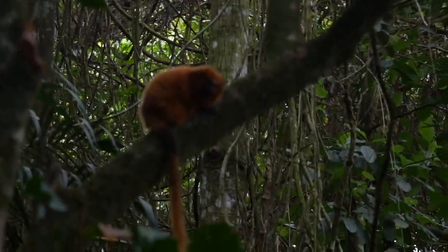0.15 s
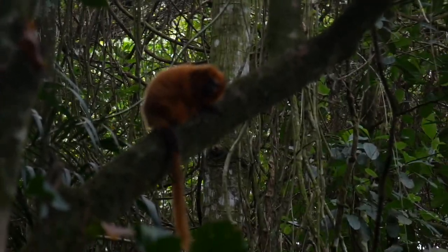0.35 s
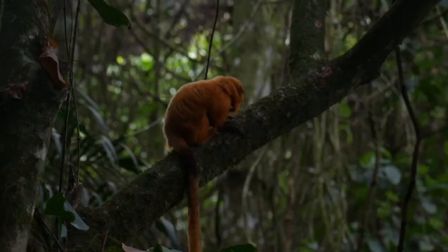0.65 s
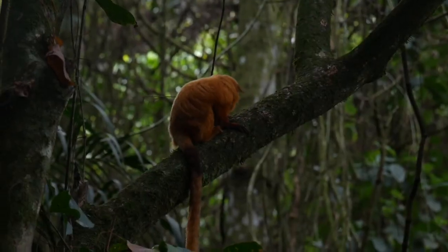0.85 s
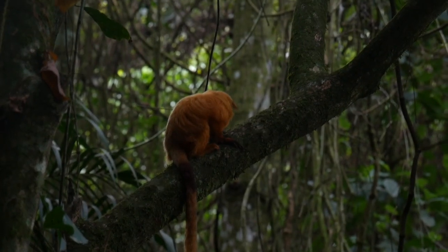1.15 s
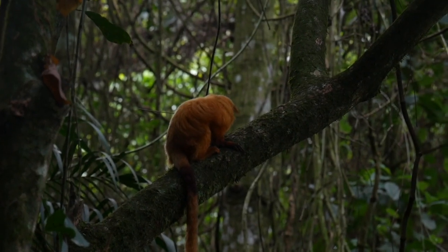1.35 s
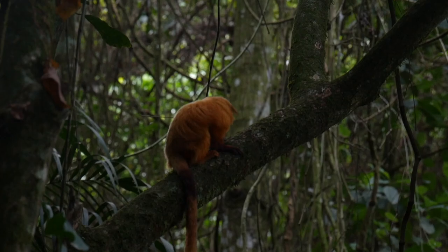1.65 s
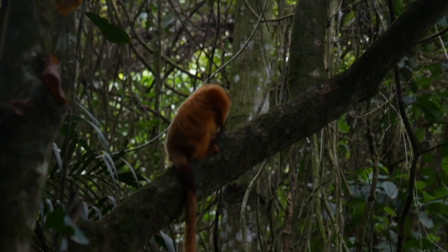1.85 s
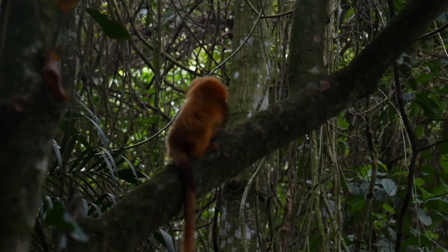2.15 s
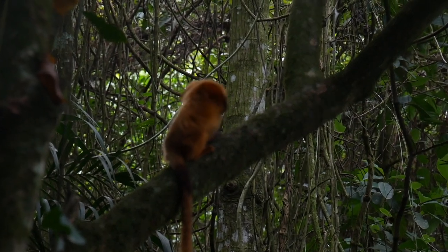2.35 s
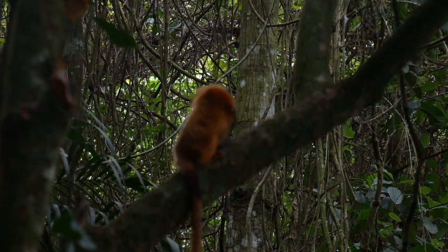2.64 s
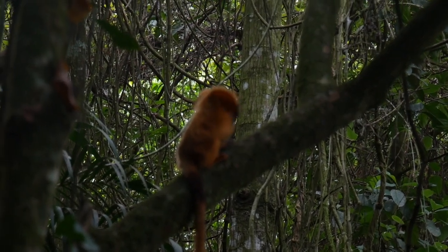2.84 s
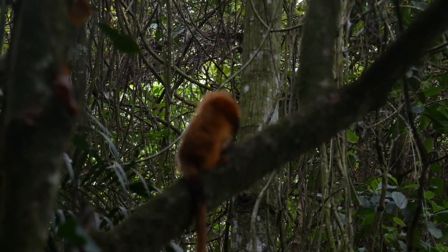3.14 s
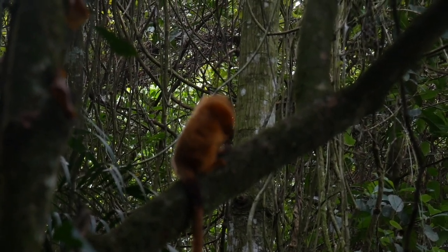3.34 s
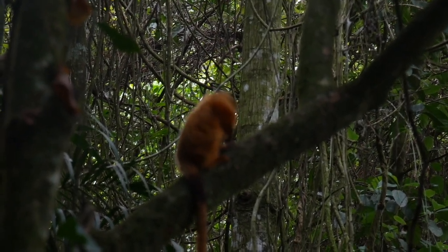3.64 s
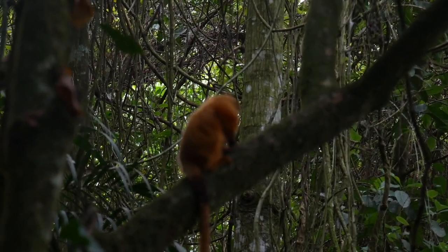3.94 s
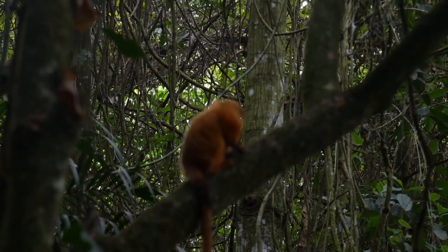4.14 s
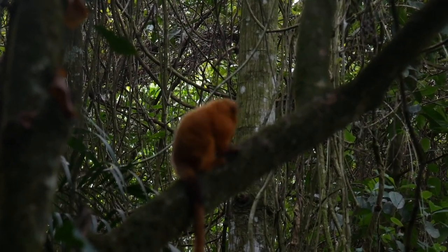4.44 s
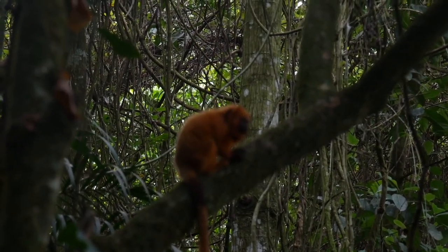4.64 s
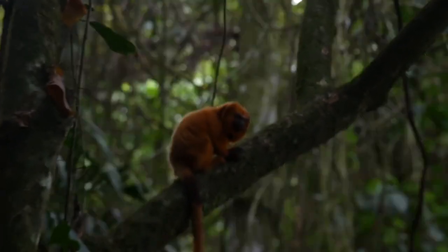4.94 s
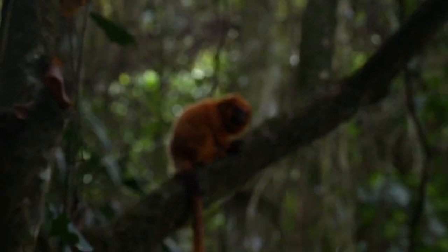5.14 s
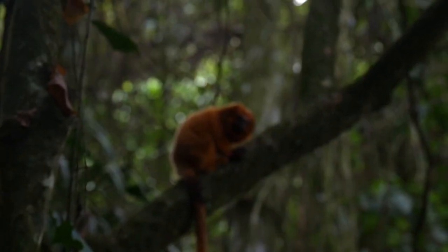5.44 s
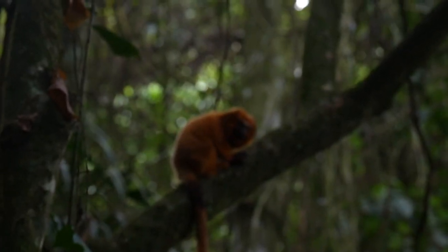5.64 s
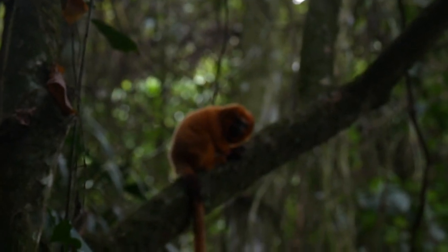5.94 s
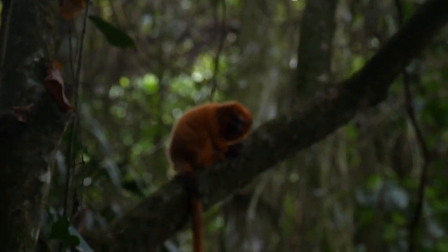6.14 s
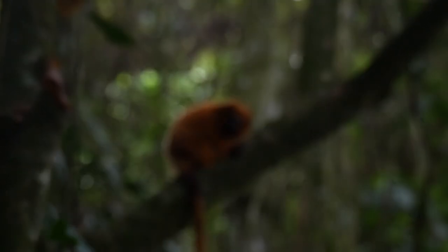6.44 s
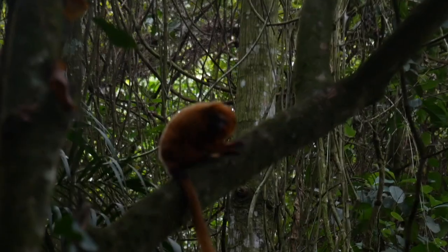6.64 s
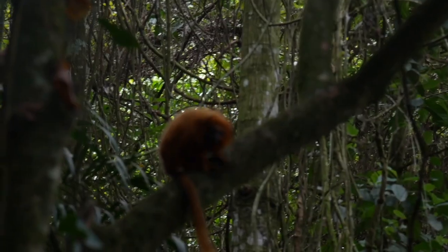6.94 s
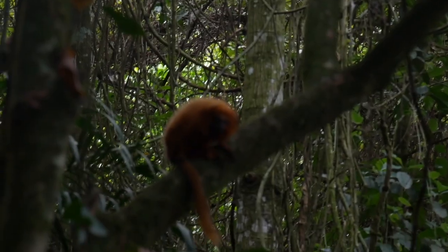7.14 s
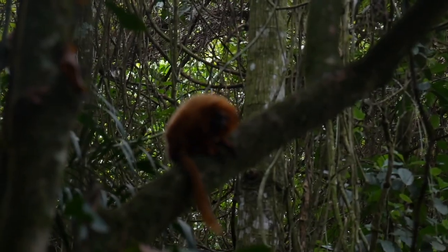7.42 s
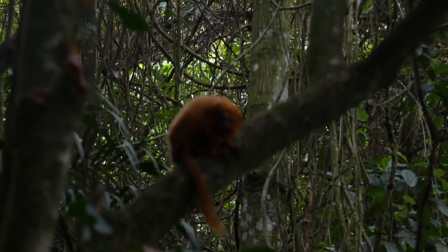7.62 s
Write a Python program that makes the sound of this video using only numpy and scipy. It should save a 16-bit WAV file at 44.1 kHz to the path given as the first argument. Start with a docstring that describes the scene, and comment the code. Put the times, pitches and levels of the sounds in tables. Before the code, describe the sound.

A small monkey opens with a hoarse, high screech lasting until 0.65 seconds, over an even rush of forest foliage, a far wavering hum and one level bird note. A twig snaps sharply close by at 0.1 seconds, another more lightly at 0.5. All sound drops out from 0.65 to 0.95 seconds; the rush returns softer, over a low rumble. From 0.95 to 2.6 seconds the monkey gives four very high, falling whistles, some trilled, each breaking into yips with a short echo. A very faint distant chirp comes near 3.1, then small twig ticks and leaf stirs from 3.5 to 4. Two more whistles with yips follow between 4.2 and 4.9. A twig cracks sharply at 5.1, with lighter ticks and rustles until 6. Two long raspy screeches run from 6.2 to 7.5 seconds, and a short one comes at 7.7.

```python
"""A forest. A tamarin gives long hoarse screeches and high, falling, trilled whistles that break
into yips; the trees echo them. Whistles and yips are gliding tones with an octave, screeches
two bands of fluttering noise. Behind them: a rush of foliage, a far hum, one level bird note and
a faint chirp. Twigs tick close by and leaves stir. All sound drops out from 0.65 to 0.94 s;
the rush returns softer, over a low rumble."""
import sys
import numpy as np
from scipy import signal
from scipy.fft import rfft, irfft, next_fast_len
from scipy.io import wavfile
from scipy.ndimage import map_coordinates

SR = 44100
rng = np.random.default_rng(int(sys.argv[2]) if len(sys.argv) > 2 else 0)


def waveform_to_disk(signal):
    """Save audio, clipped to [-1, 1], as 16-bit WAV at the path in sys.argv[1]."""
    frames = np.transpose(np.atleast_2d(signal))
    scaled = np.clip(frames, -1, 1) * 32767
    samples = np.round(scaled).astype(np.int16)
    wavfile.write(sys.argv[1], SR, samples)


N = 343098
TIME = np.arange(N) / SR
GAP_START_S, GAP_END_S = .648, .939

# voice strength over its range: (pitch [Hz], gain [dB])
VOICE_STRENGTH = [(4000, 0), (5300, -2.5), (6800, 0.5), (8500, -3.5), (12500, -5.5)]


def amp(db):
    """Decibels to gain."""
    return 10 ** (np.asarray(db) / 20)


def unit(x):
    """x at rms 1."""
    return x / np.sqrt(np.mean(x ** 2) + 1e-20)


def along(points, hz):
    """(Hz, value) points read on a log axis."""
    f, v = np.transpose(points)
    return np.interp(np.log(hz + 1), np.log(f + 1), v)


def during(start_s, end_s):
    """Sample times from start to end."""
    return TIME[(TIME >= start_s) & (TIME < end_s)]


def gate(start_s, end_s, ramp_s):
    """Open from start to end, with linear ramps."""
    return np.clip(np.minimum(TIME - start_s, end_s - TIME) / ramp_s + .5, 0, 1)


def arch(t, start_s, length_s):
    """Parabola: 0 mid-sound, -1 at the ends and beyond."""
    return -np.clip(2 * (t - start_s) / length_s - 1, -1, 1) ** 2


def wobble(rate_hz, t=TIME):
    """Smooth random curve, rate_hz knots a second."""
    return map_coordinates(rng.standard_normal(int(N * rate_hz / SR) + 4), [t * rate_hz])


def filtered(x, response):
    """x through a gain given as a function of Hz."""
    m = next_fast_len(N + 8192)
    return irfft(rfft(x, m) * response(np.fft.rfftfreq(m, 1 / SR)), m)[..., :N]


def coloured(x, spectrum):
    """x through a curve of (Hz, dB) points."""
    return filtered(x, lambda hz: amp(along(spectrum, hz)))


def rush(spectrum):
    """Stereo noise at rms 1, nearly mono in the bass, wider in the treble."""
    # left-right likeness: (frequency [Hz], correlation [1])
    likeness = [(60, 0.92), (150, 0.91), (380, 0.75), (950, 0.83), (2380, 0.6), (5980, 0.77), (15000, 0.33)]

    def mid_side_gains(hz):
        angle = np.arccos(np.clip(along(likeness, hz), -1, 1)) / 2
        return amp(along(spectrum, hz)) * [np.cos(angle), np.sin(angle)]

    mid, side = filtered(rng.standard_normal((2, N)), mid_side_gains)
    return unit(np.array([mid + side, mid - side]))


def foliage(early_db=-27.5, late_db=-34.5, drone_hz=56):
    """Even rush of the trees; softer after the gap, over a low rumble and drone."""
    # noise spectra: (frequency [Hz], relative density [dB])
    early_spectrum = [(15, -67), (25, -39.5), (45, -23.5), (85, -19.5), (124, -28.5), (227, -14),
                      (303, -14.5), (343, -4), (381, -11), (510, -12.5), (1100, -10.5), (2190, -30.5),
                      (3600, -41.5), (4680, -62), (7920, -120)]
    late_spectrum = [(70, -43), (120, -16.5), (200, -8), (310, -3), (600, -5), (1000, -4), (1450, -6.5),
                     (2000, -13.5), (2800, -24), (3800, -29), (6000, -42), (10000, -47.5), (14500, -60.5),
                     (15800, -62)]
    rumble_spectrum = [(18, -45), (30, -21.5), (42, -7), (55, 0.5), (75, -4.5), (97, -0.5), (130, -12),
                       (170, -8), (260, -46)]
    # brief dip in the background level just after 2 s: (time [s], gain [dB])
    dip = [(1.0, -1.5), (2.015, -2), (2.03, -10.5), (2.15, -4.5), (2.42, -0.5)]
    early = amp(early_db) * rush(early_spectrum)
    late = amp(late_db + np.interp(TIME, *np.transpose(dip))) * rush(late_spectrum)
    drone = amp(-56 + 1.46 * wobble(3.9)) * np.sin(2 * np.pi * drone_hz * TIME)
    rumble = amp(-51) * rush(rumble_spectrum)
    return np.where(TIME < GAP_END_S, early, late + rumble + drone) * amp(.423 * wobble(6.5))


def hum(arch_db=3.5):
    """A far, wavering tone that comes and goes."""
    # swells: (start [s], length [s], pitch [Hz], level [dB])
    swells = [(0, 0.75, 347, -34.5), (0.947, 0.14, 319, -36), (1.164, 0.1, 321, -38.5),
              (1.32, 0.36, 319, -36), (1.7, 2.8, 319.1, -47.5), (5.3, 1.86, 573, -46),
              (5.5, 1.6, 830, -45.5), (7.62, 0.25, 265.4, -42.5)]
    out = np.zeros(N)
    for start, length, hz, db in swells:
        phase = 2 * np.pi * np.cumsum(hz + 4 * wobble(30)) / SR
        level_db = db + arch_db * arch(TIME, start, length) + 1.7 * wobble(23)
        out += amp(level_db) * np.sin(phase) * gate(start, start + length, .032)
    return out


def forest_echo(x, near_db=5.5, near_s=.034):
    """Trunks and leaves scatter sound: a dense near echo, then a smooth stereo decay."""
    # echo decay: (frequency [Hz], t60 [s])
    decay = [(1000, 0.299), (6000, 0.57), (10000, 0.52), (15000, 0.33)]
    # echo width: (frequency [Hz], side gain [dB])
    width = [(2000, 1.5), (6000, -12), (9000, -10.5), (12000, -1.5)]
    hz, t, bins = signal.stft(rng.standard_normal((2, SR)), SR, nperseg=256)
    bins *= amp(-60 * t / along(decay, hz)[:, None] + near_db * np.exp(-t / near_s))
    bins[1] *= amp(along(width, hz))[:, None]
    tail = signal.istft(bins, SR, nperseg=256)[1]
    mid, side = signal.fftconvolve(x[None], tail / np.linalg.norm(tail[0]), axes=1)[:, :N]
    return np.array([mid + side, mid - side])


def voice(t, pitch_hz, db, octave_db, hoarse, ramp_s=.0021):
    """Trembling tone plus octave, which the throat favours at low pitch; hoarse is pitch scatter."""
    # throat response: (frequency [Hz], gain [dB])
    throat = [(3800, -21), (5000, -4.5), (6000, -0.5), (7500, 1), (10000, 4), (11500, -5.5), (13000, -8),
              (16000, -19)]
    pitch_hz = pitch_hz * (1 + .005 * wobble(130, t))
    jitter = hoarse * (wobble(500, t) + wobble(2500, t))
    phase = 2 * np.pi * np.cumsum(pitch_hz * (1 + jitter)) / SR
    fundamental = amp(along(throat, pitch_hz))
    thinning_db = 3.5 * np.maximum(pitch_hz - 5800, 0) / 1000
    octave = amp(along(throat, 2 * pitch_hz) + octave_db - thinning_db) * (2 * pitch_hz < SR / 2)
    tone = (fundamental * np.sin(phase) + octave * np.sin(2 * phase)) / np.hypot(fundamental, octave)
    ramps = np.clip(np.minimum(t - t[0], t[-1] - t) / ramp_s, 0, 1)
    shimmer_db = 2 * wobble(300, t) + 1.67 * wobble(70, t)
    out = np.zeros(N)
    out[round(t[0] * SR):][:len(t)] = np.sqrt(2) * tone * ramps * amp(db + shimmer_db)
    return out


def note(start_s, length_s, from_hz, to_hz, db, hoarse, octave_db):
    """A short straight glide that swells and fades."""
    t = during(start_s, start_s + length_s)
    level_db = db + 5 * arch(t, start_s, length_s)
    return voice(t, np.linspace(from_hz, to_hz, len(t)), level_db, octave_db, hoarse)


def screeches(split_hz=8320):
    """The voice breaks from short notes into a chaotic rasp: two formants, each with its own flutter."""
    # opening and closing notes:
    # (start [s], length [s], from [Hz], to [Hz], relative level [dB], pitch scatter [1])
    edge_notes = [ (.004, .028, 5840, 6270, -33.5, 0.0045), (6.146, 0.036, 6900, 6050, -36, .006),
                  (6.702, .028, 6750, 6080, -29.5, 0.013), (6.828, .07, 5220, 6080, -39, .06),
                  (7.43, 0.034, 6470, 6130, -32, .01), (7.636, .028, 7090, 5790, -37, .016), ]
    # rasps: (start [s], end [s], lower attack [s], lower formant gain [dB], upper formant gain [dB],
    # upper swell [dB])
    rasps = [(0.017, 0.657, 0.011, -28.5, -36.5, 5.5), (6.176, 6.722, 0.0089, -32.5, -32, 9.5),
             (6.829, 7.452, 0.015, -32, -37, 3.5), (7.655, 7.808, .008, -30, -41.5, 0.5)]
    # one spectrum per rasp: (frequency [Hz], relative density [dB])
    spectra = [
        [(2530, -27), (4300, -24.5), (4740, -31), (5000, -20), (5680, -11.5), (6060, -4.5), (6570, -7),
         (7080, -0.5), (8680, -19), (9310, -13.5), (12100, -23.5), (14500, -29.5), (15500, -42.5)],
        [(2530, -13), (4300, -18), (4660, -16), (6060, 5.5), (7240, 6.5), (8320, -1.5), (8640, -4),
         (9880, -6.5), (10500, -10), (11600, -22), (13200, -21), (14500, -21.5), (15500, -28.5)],
        [(2530, -20), (4300, -22.5), (4810, -20), (5270, -10), (5930, -3.5), (7040, 2), (8590, -7),
         (9980, -4.5), (10600, -7), (11600, -14.5), (14200, -17), (15200, -22), (15500, -33.5)],
        [(2530, -61), (4300, -30), (4640, -44), (5190, -23), (6460, -8), (8060, -22), (12000, -8.5),
         (14800, -24), (15200, -42.5), (15500, -61.5)],
    ]
    rasp = np.zeros(N)
    for (start, end, attack, low_db, high_db, swell_db), spectrum in zip(rasps, spectra):
        noise = coloured(rng.standard_normal(N), spectrum)
        below = filtered(noise, lambda hz: 1 / (1 + (hz / split_hz) ** 12))
        low = unit(below * amp(2.5 * wobble(600) + 1.3 * wobble(70)))
        high = unit((noise - below) * amp(2.5 * wobble(600) + 1.3 * wobble(70)))
        effort = arch(TIME, start, end - start)
        onset = 1 - np.exp(-np.maximum(TIME - start, 0) / attack)
        low *= amp(low_db + 2 * effort) * onset
        high *= amp(high_db + swell_db * effort)
        rasp += (low + high) * gate(start, end, .03)
    notes = sum(note(*row, octave_db=-7.5) for row in edge_notes)
    call = amp(-6) * rasp + amp(-1.5) * notes
    return (call + amp(3) * forest_echo(call)) * amp([[-.4], [.4]])


def bird(start_s=.026, length_s=.53, pitch_hz=3900, db=-37.5, fade_db_per_s=9):
    """One long, slightly wavering note from deep in the trees."""
    phase = 2 * np.pi * np.cumsum(pitch_hz + 11 * wobble(50) + 8 * wobble(9)) / SR
    level_db = db - fade_db_per_s * (TIME - start_s) + 1.2 * wobble(11)
    tone = np.sqrt(2) * amp(level_db) * np.sin(phase) * gate(start_s, start_s + length_s, .0066)
    return tone + amp(-7) * forest_echo(tone)


def twig_ticks(crack_t60_s=.014, attack_s=.00045, ear_phase_rad=.67):
    """Each twig snaps with a bright crack and a woody ring that reaches the two ears out of step."""
    # snaps: (time [s], peak [dB], ring pitch [Hz], ring weight [dB], crack weight [dB], left-right [dB])
    snaps = [(0.0815, -4, 1865, -12, -22.5, -3), (0.5023, -15, 1810, -23, -19.5, -5),
             (3.6627, -24, 2005, -22, -37, 1), (3.6768, -16.5, 1780, -22.5, -29.5, 3),
             (3.9769, -28.5, 1890, -39, -38, 0), (5.066, -21.5, 1920, -18, -25.5, 0),
             (5.0778, -4.5, 1860, -11, -23, -2), (5.473, -14, 2993, -19, -32, 0.5),
             (5.6094, -27, 1876, -36, -38.5, 3), (5.9183, -25.5, 1695, -33, -40, 1),
             (7.155, -25.5, 3230, -30.5, -29, -4), (7.7604, -22.5, 1860, -27, -28, 2)]
    # twig modes: (multiple of ring pitch [1], gain [dB], t60 [s])
    modes = [(.56, -3.5, 0.02), (.83, -4, 0.016), (1, -1.5, 0.018), (1.19, -8.5, 0.029), (1.35, -6, 0.02),
             (1.56, -5.5, 0.019), (1.84, -0.5, 0.011), (2.05, -4.5, 0.0098), (2.8, -10.5, 0.0098)]
    out, t = np.zeros((2, N + SR)), np.arange(SR // 20) / SR
    treble = signal.butter(3, [2500, 9500], "band", fs=SR, output="sos")
    ears = np.array([[1], [-1]])
    for start, peak_db, ring_hz, ring_db, crack_db, pan_db in snaps:
        ring = 0
        for multiple, db, t60 in modes:
            phase = 2 * np.pi * (ring_hz * multiple * rng.normal(1, .013) * t + rng.random())
            ring += amp(db + rng.normal(0, 1.5) - 60 * t / t60) * np.sin(phase + ear_phase_rad * ears)
        noise = rng.standard_normal(len(t)) + .46 * ears * rng.standard_normal(len(t))
        crack = signal.sosfilt(treble, noise) * amp(-60 * t / crack_t60_s)
        snap = (amp(ring_db + 1) * ring + amp(crack_db + 10) * crack) * (1 - np.exp(-t / attack_s))
        snap /= np.abs(snap.mean(0)).max()
        out[:, round(start * SR):][:, :len(t)] += amp(peak_db + ears * pan_db / 2) * snap
    return out[:, :N] + amp(-21) * forest_echo(out[:, :N].mean(0))


def whistle(row, octave_db, hoarse, slip_s=.0013):
    """The pitch holds, glides down and sags; trills lift it in quick waves, rough at their crests."""
    # trills: (start [s], length [s], rate [Hz], depth [Hz])
    trills = [(0.948, 0.16, 24.77, 1250), (1.449, 0.13, 31.2, 1257), (1.889, 0.0235, 41, 630),
              (4.547, 0.059, 36.57, 1135), (4.605, .14, 46.5, 148)]
    start, length, open_hz, hold, glide, settled_hz, sag_hz_per_s, db, swell_db_per_s = row
    t = during(start, start + length)
    age = t - start
    gliding = np.maximum(age - hold, 0)
    pitch_hz = settled_hz + (open_hz - settled_hz) * np.exp(-gliding / glide) - sag_hz_per_s * age
    beat = t + slip_s * wobble(60, t)
    lift_hz = sum(depth * np.sin(np.pi * rate * (beat - s)) ** 2 * ((beat > s) & (beat < s + span))
                  for s, span, rate, depth in trills)
    pitch_hz += lift_hz
    hold_cut_db = 3 * np.exp(-gliding / .0066)
    level_db = db + swell_db_per_s * (age - length / 2) - hold_cut_db + along(VOICE_STRENGTH, pitch_hz)
    deepest_hz = max(trill[3] for trill in trills)
    return voice(t, pitch_hz, level_db, octave_db, hoarse + .005 * lift_hz / deepest_hz)


def yip(row, hoarse, rise_db=12, fade_db=3):
    """The voice leaps to a crest and falls away, rougher than in a whistle."""
    crest, rise, fall, crest_hz, end_hz, bend, db, octave_db = row
    t = during(crest - rise, crest + fall)
    before, after = np.maximum(crest - t, 0) / rise, np.maximum(t - crest, 0) / fall
    pitch_hz = crest_hz * np.exp(-.2 * before) * (end_hz / crest_hz) ** (after ** bend)
    level_db = db - rise_db * before - fade_db * after + along(VOICE_STRENGTH, pitch_hz)
    return voice(t, pitch_hz, level_db, octave_db, hoarse + .003)


def whistled_calls():
    """Whistles break into yips and echo; the direct sound is bright near 11 kHz, dipping at 12.5 kHz."""
    # whistles: (start [s], length [s], opening [Hz], hold [s], glide [s], settled [Hz], sag [Hz/s],
    # relative level [dB], swell [dB/s])
    whistles = [ (0.938, .14, 9890, .003, .003, 7010, 7580, -17, -10),
                (1.323, .232, 9040, .035, .032, 5557, 800, -19, 12),
                (1.842, .175, 8130, .028, .036, 5544, 302, -18.5, -12.5),
                (2.343, 0.067, 9000, .035, .014, 5930, 500, -20.5, 101.5),
                (4.17, .048, 9290, .023, .012, 7220, 1990, -24, -120),
                (4.525, .224, 7755, .008, .028, 5760, 4097, -22, 3.5), ]
    # manner of each call: (whistle octave [dB], echo [dB], left-right [dB], pitch scatter [1])
    manners = [(-3.5, -4, -1, 0.0091), (-6.5, -5, -1.5, 0.0055), (-3.5, -5, -2, 0.0061),
               (2.5, -7.5, -1.5, 0.011), (-4, -1, -1.5, .014), (-2.5, -4.5, -1.5, 0.0054)]
    # yips: (crest time [s], rise [s], fall [s], crest [Hz], end [Hz], fall exponent [1],
    # relative level [dB], octave [dB])
    yips = [ (1.092, .014, .047, 7850, 4800, 1.4, -19, -3), (1.569, .015, .042, 6450, 4750, .85, -17.5, -5),
            (1.652, 0.037, 0.021, 5530, 4055, 2.2, -21.5, -5),
            (2.006, .003, 0.014, 8130, 7900, 2, -17.5, -9.5),
            (2.015, .003, .029, 7250, 5050, 1.7, -12.5, 4), (2.098, .035, 0.042, 6710, 4450, 1.3, -22, -3),
            (2.426, .011, .05, 9890, 6430, 0.94, -16, 1.5),
            (2.486, .011, .064, 8860, 5610, 1.1, -17.5, 2.5),
            (4.162, .002, 0.0128, 12400, 9900, 1, -31.5, -6),
            (4.229, .011, .044, 12340, 5650, .58, -24, -4.5), (4.291, .014, .034, 7410, 5160, .75, -24, -6),
            (4.762, .012, .029, 5425, 4060, 2.2, -20.5, -3),
            (4.809, 0.0092, .046, 7270, 3880, .9, -23, -2.5), ]
    # colours of the direct and echo paths: (frequency [Hz], gain [dB])
    direct_colour = [(6000, -4.5), (10800, 0.5), (12500, -7), (15000, -1)]
    echo_colour = [(4500, 1.5), (5500, -0.5), (7000, -0.5), (10000, 3), (14000, -1.5)]
    out, starts = np.zeros((2, N)), [row[0] for row in whistles]
    for k, (row, (octave_db, echo_db, pan_db, hoarse)) in enumerate(zip(whistles, manners)):
        call = whistle(row, octave_db, hoarse)
        # yips between this whistle's start and the next
        call += sum(yip(y, hoarse) for y in yips if np.searchsorted(starts, y[0]) == k + 1)
        direct = amp(-2) * coloured(call, direct_colour)
        echo = amp(echo_db) * forest_echo(coloured(call, echo_colour))
        out += (direct + echo) * amp([[pan_db / 2], [-pan_db / 2]])
    return out


def far_chirp(start_s=3.11):
    """A faint falling chirp, so distant that only its echo arrives."""
    # glide: (length [s], from [Hz], to [Hz], level [dB])
    glide = (0.1, 5000, 4550.5, -62)
    return forest_echo(note(start_s, *glide, hoarse=.02, octave_db=-33))


def rustles():
    """Leaves stir in short, grainy swells."""
    # stirs: (time [s], level [dB], half length [s])
    stirs = [(3.482, -63.5, 0.0585), (3.874, -68, 0.054), (5.603, -47, 0.0147), (5.722, -57.5, .05)]
    # leaf noise: (frequency [Hz], relative density [dB])
    leaf_spectrum = [(1500, -22), (3000, 3.5), (6000, -1.5), (10000, -2), (15000, -17)]
    swell = sum(amp(db) * np.exp(-.5 * ((TIME - s) / half) ** 2) for s, db, half in stirs)
    return swell * unit(rush(leaf_spectrum) * amp(3.5 * wobble(530)))


def scene():
    """The tamarin in its forest, in stereo."""
    tamarin = whistled_calls() + screeches()
    return tamarin + bird() + far_chirp() + twig_ticks() + rustles() + hum() + foliage()


def record(dry):
    """Mute the gap; remove everything above 15.6 kHz."""
    gapped = dry * (1 - gate(GAP_START_S, GAP_END_S, .0077))
    return filtered(gapped, lambda hz: hz < 15600)


dry = scene()
out = record(dry)
waveform_to_disk(out)
```